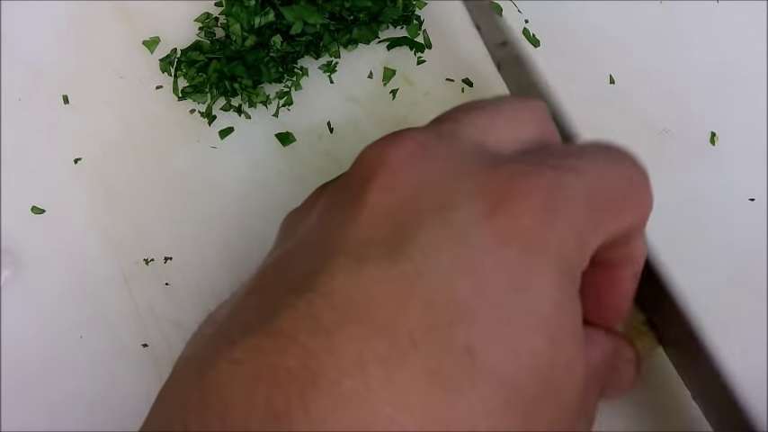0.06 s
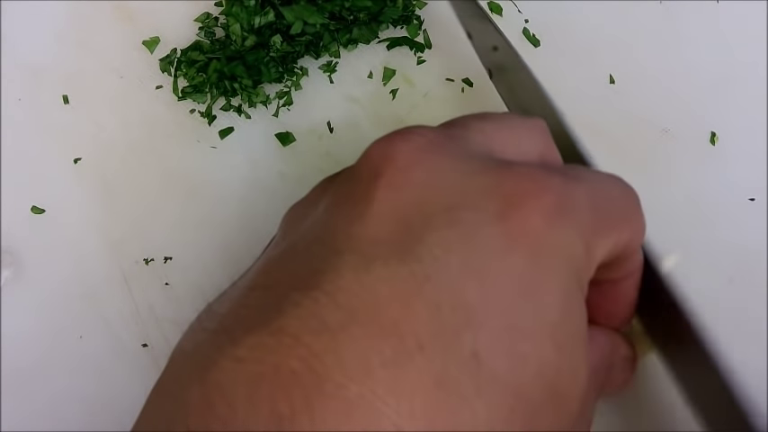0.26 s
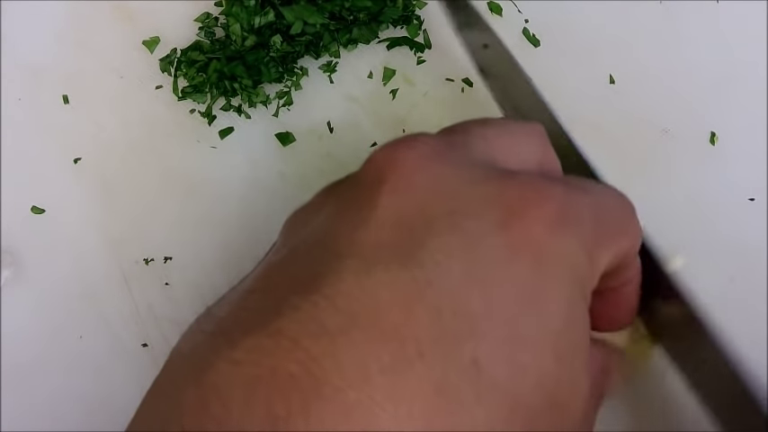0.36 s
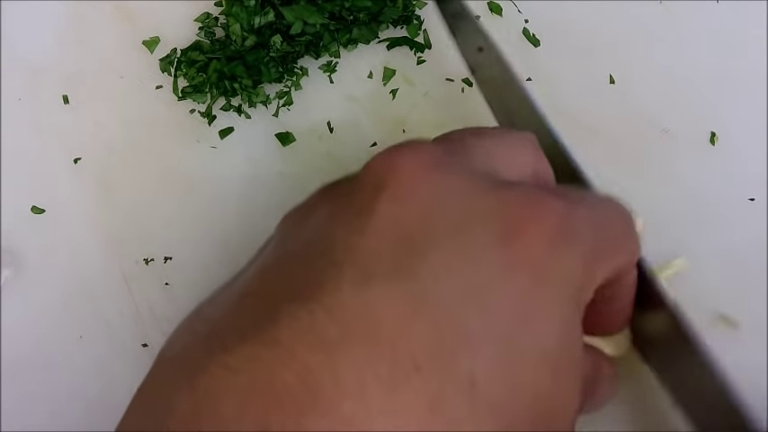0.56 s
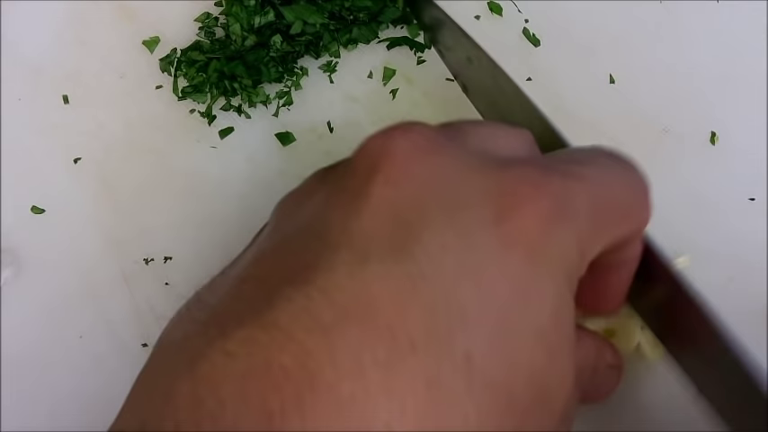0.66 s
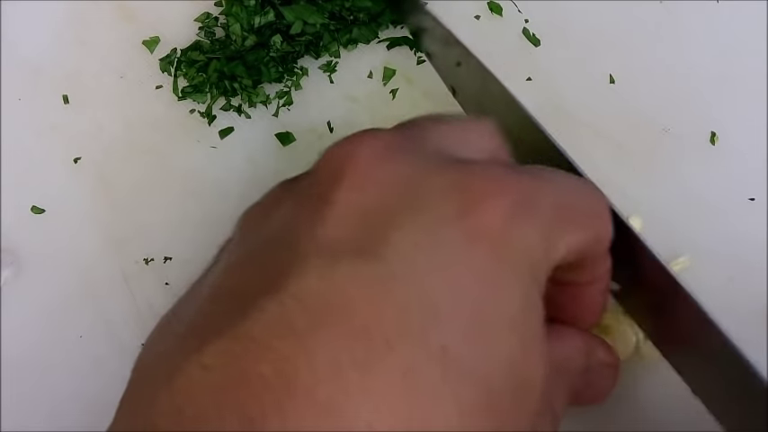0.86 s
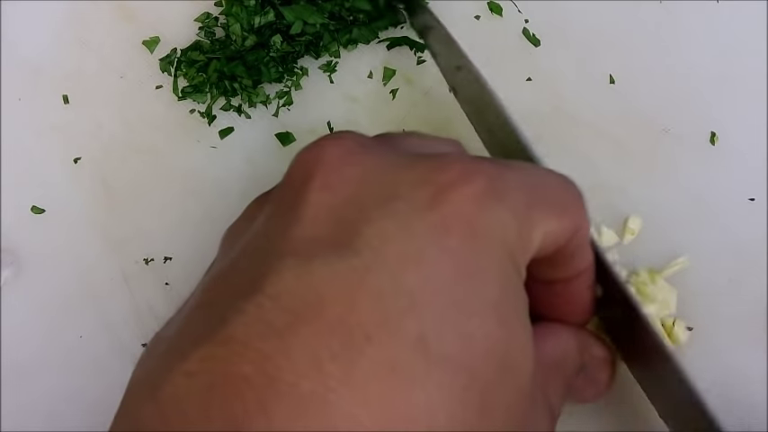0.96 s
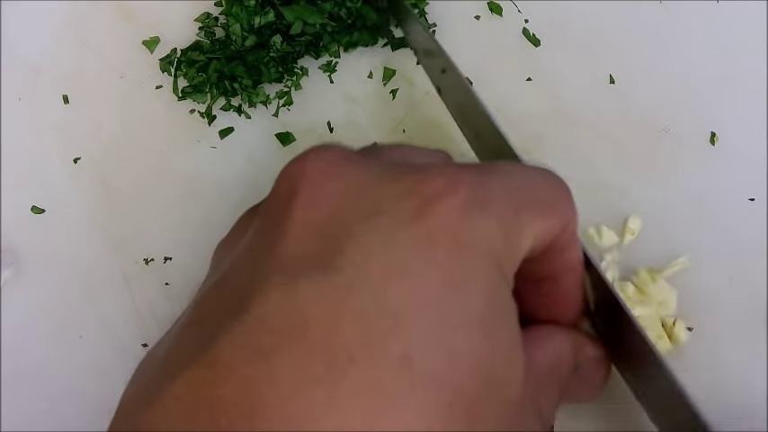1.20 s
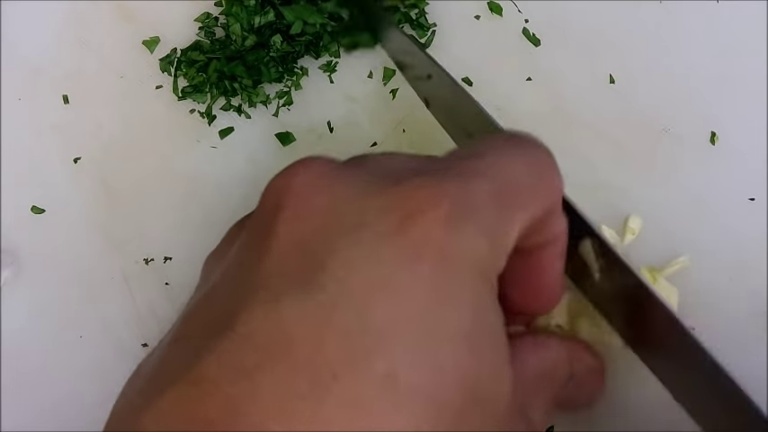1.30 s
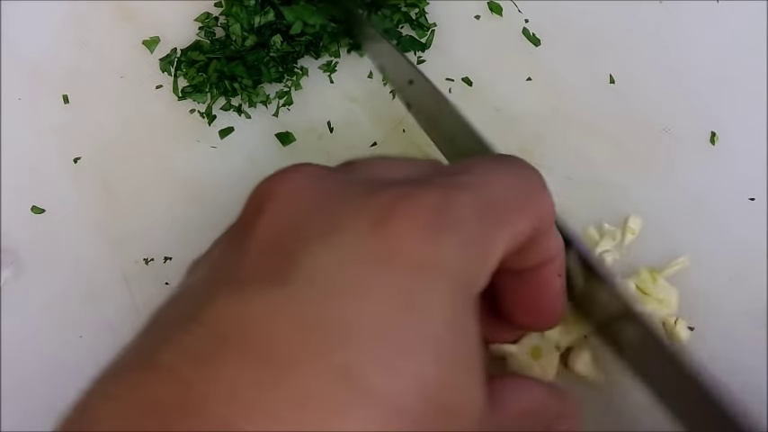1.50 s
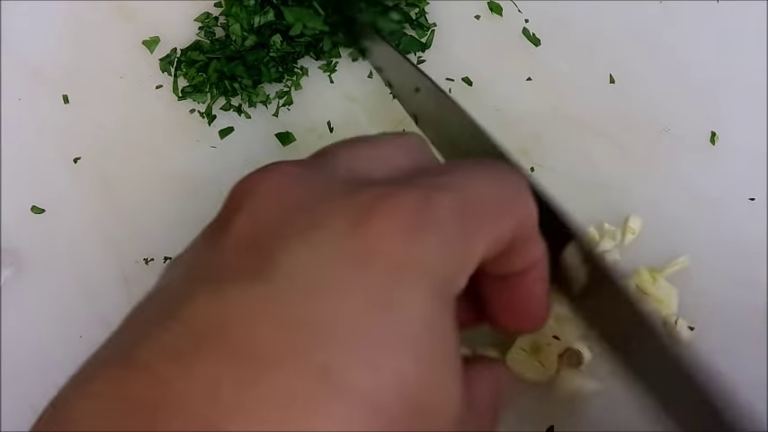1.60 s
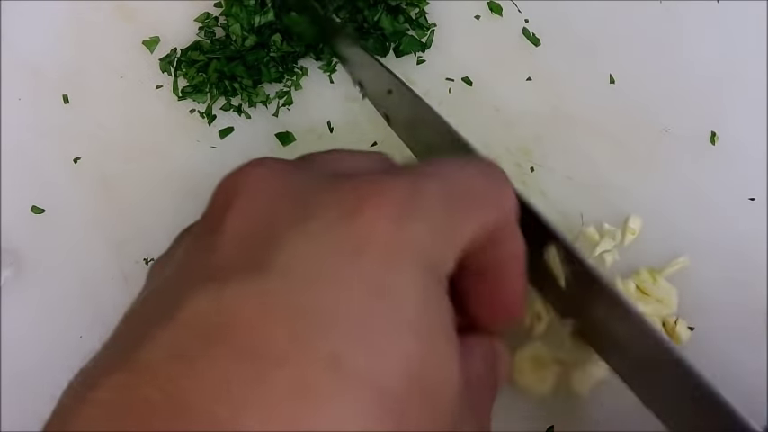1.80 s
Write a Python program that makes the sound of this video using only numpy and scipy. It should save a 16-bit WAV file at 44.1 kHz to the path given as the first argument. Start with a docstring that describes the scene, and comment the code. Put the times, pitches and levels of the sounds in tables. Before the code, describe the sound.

Close, steady knife chops through garlic, each crunch followed by a dull knock on plastic.

```python
"""A knock dies away, then crunch and knock alternate about four and a half times a second: a large
knife slices garlic on a plastic board, close by. In each stroke the clove's fibres fracture, then the
impact excites damped modes of the board and a low thump in the counter below. The steel blade rings
faintly, and a small kitchen reverberates over a quiet hum. The last stroke only crunches and does
not reach the board."""
import sys
import numpy as np
from scipy import signal
from scipy.fft import rfft, irfft, next_fast_len
from scipy.io import wavfile

SR = 44100
rng = np.random.default_rng(int(sys.argv[2]) if len(sys.argv) > 2 else 0)


def log_audio(samples):
    """Write samples as a 16-bit WAV file to the path given in sys.argv[1]."""
    # one column per channel
    frames = np.atleast_2d(samples).T
    # limit to full scale, then quantise
    limited = np.clip(frames, -1, 1)
    pcm = np.round(limited * 32767).astype(np.int16)
    wavfile.write(sys.argv[1], SR, pcm)


N = 81585
LEAD = SR // 10  # samples before time zero, so that an earlier chop still rings
SIZE = N + LEAD


def amp(db):
    """Decibels to amplitude ratio."""
    return 10 ** (np.asarray(db) / 20)

def unit(x):
    """Normalisation to rms 1."""
    return x / np.sqrt(np.mean(x ** 2) + 1e-20)

def along(points, hz):
    """Interpolation of (frequency, value) points on a logarithmic axis."""
    f, v = np.transpose(points)
    return np.interp(np.log(hz + 1), np.log(f + 1), v)

def filtered(x, response):
    """Linear filtering: the spectrum times a frequency response."""
    n = x.shape[-1]
    m = next_fast_len(n + 8192)
    return irfft(rfft(x, m) * response(np.fft.rfftfreq(m, 1 / SR)), m)[..., :n]

def rolled_off(x, hz, kind):
    """Causal third-order low-pass or high-pass."""
    return signal.sosfilt(signal.butter(3, hz, kind, fs=SR, output="sos"), x)

def coloured(x, spectrum):
    """Spectral shaping, at rms 1."""
    return unit(filtered(x, lambda hz: amp(along(spectrum, hz))))

def spread(pair, width):
    """Mid-side stereo from two uncorrelated signals."""
    mid, side = pair[0], width * pair[1]
    return np.array([mid + side, mid - side]) / np.sqrt(1 + width ** 2)

def noise(spectrum, width):
    """Coloured stereo noise of rms 1."""
    return coloured(spread(rng.standard_normal((2, SIZE)), width), spectrum)

def since(onset):
    """Seconds since the onset, zero before it."""
    return np.maximum((np.arange(SIZE) - LEAD) / SR - onset, 0)

def ring(t, hz, t60, rise):
    """A damped mode: a sinusoid that builds up and decays exponentially."""
    return np.sin(2 * np.pi * hz * t) * amp(-60 * t / t60) * (1 - np.exp(-t / rise))

def burst(onset, t60):
    """An envelope of sudden onset and exponential decay."""
    t = since(onset)
    return (t > 0) * amp(-60 * t / t60)


# ambient noise spectrum: (frequency [Hz], relative level [dB])
AMBIENT_SPECTRUM = [(25, -8), (60, 4.5), (110, -2), (300, 0), (500, -4), (1300, -5.5), (2500, -14.5),
                    (5000, -27.5), (15000, -38.5)]
# course of the hiss: (time [s], gain [dB])
HISS_FADE = [(1.25, 0), (1.449, -5), (1.7, -5)]
def background(air_db=-59, hiss_from_hz=2600, hum_hz=120.7, hum_db=-61):
    """Broadband room noise, whose hiss sinks toward the end, and the pure tone of an appliance's hum."""
    air = noise(AMBIENT_SPECTRUM, width=0.57)
    hiss = filtered(air, lambda hz: hz > hiss_from_hz)
    fade = amp(np.interp(since(0), *np.transpose(HISS_FADE)))
    hum = np.sin(2 * np.pi * hum_hz * since(0))
    return amp(air_db) * (air - hiss + fade * hiss) + amp(hum_db) * hum


# reverberation time: (frequency [Hz], T60 [s])
REVERB_TIMES = [(100, 0.26), (500, 0.33), (3000, 0.46), (8000, 0.54), (16000, 0.19)]
# colour of the reverberant field: (frequency [Hz], gain [dB])
REVERB_COLOUR = [(60, -5), (300, -0.5), (550, 7), (900, -4), (1300, -10.5), (1900, 1), (4000, -1),
                 (8000, -1.5), (16000, 2)]
def kitchen(x, tail_db=-8.5, early_db=-6.5, early_t60=0.1, delay_s=0.006):
    """Reverberation: convolution with dense early reflections and a short diffuse tail."""
    hz, t, spectra = signal.stft(rng.standard_normal((2, SR // 2)), SR, nperseg=256)
    absorption = amp(-60 * t / along(REVERB_TIMES, hz)[:, None])
    tail = signal.istft(spectra * absorption, SR, nperseg=256)[1]
    size = tail.shape[1]
    early = rng.standard_normal((2, size)) * amp(-60 * np.arange(size) / SR / early_t60)
    response = spread(amp(tail_db) * unit(tail) + amp(early_db) * unit(early), width=1) / np.sqrt(size)
    wet = signal.fftconvolve(x.mean(axis=0)[None], response, axes=1)[:, :SIZE]
    return filtered(wet, lambda f: amp(along(REVERB_COLOUR, f)) * np.exp(-2j * np.pi * f * delay_s))


# the knife's quick rebound just after each blow (first row), then echoes from nearby walls:
# (delay [s], level [dB], left share [0-1])
REBOUND_AND_ECHOES = [(.0105, -22.5, .5), (0.0165, -29.5, 0.6), (0.026, -21, 0.6), (.035, -28, 0.5),
                      (.063, -29, 0.3)]
def rebound_and_echoes(x):
    """Delay and attenuation: weaker copies stand for the knife's rebound, then for wall reflections."""
    def copies(hz):
        return sum(amp(db) * 2 * np.array([[left], [1 - left]]) * np.exp(-2j * np.pi * hz * delay)
                   for delay, db, left in REBOUND_AND_ECHOES)
    return filtered(x, copies)


# steel modes of the free blade: (frequency [Hz], level [dB], T60 [s])
BLADE_MODES = [(1410, -52, 0.48), (3410, -74, 0.36), (4265, -67, 0.25), (5110, -78.5, 0.52),
               (5185, -80, 0.65)]
# blows that leave the blade ringing: (time [s], level [dB])
BLADE_BLOWS = [(-.024, 1), (.2044, 0), (.4085, -9)]
# the blade dragging in the clove: (frequency [Hz], level [dB])
DRAG_MODES = [(2170, -45), (3020, -46.5)]
def blade(drag_at_s=1.798, drag_t60=0.045):
    """Free vibration: lightly damped steel rings on; held in the clove, it only grates briefly."""
    free = sum(amp(db + blow_db) * ring(since(onset), hz, t60, rise=0.0019)
               for onset, blow_db in BLADE_BLOWS for hz, db, t60 in BLADE_MODES)
    drag = sum(amp(db) * ring(since(drag_at_s), hz, drag_t60, rise=0.0012) for hz, db in DRAG_MODES)
    return free + drag


# modes of the counter: (frequency [Hz], level [dB], T60 [s], delay [s])
COUNTER_MODES = [(77.8, -30.5, 0.14, 0.0014), (100, -22.5, 0.076, 0.0052), (151.4, -20, 0.03, 0.01343),
                 (182.2, -45.5, 0.49, 0.0035), (245, -33, 0.091, 0.00034), (288.94, -35, 0.33, 0.0012),
                 (334, -43, 0.097, 0.00428)]
def counter(rise_cycles=0.64, lowest_hz=57, pan_db=1):
    """Structure-borne sound: the counter answers each impact with a low thump and a hollow ring."""
    thump = np.zeros(SIZE)
    for onset, _, thump_db, _, _ in IMPACTS:
        for hz, db, t60, delay in COUNTER_MODES:
            thump += amp(db + thump_db) * ring(since(onset + delay), hz, t60, rise_cycles / hz)
    return rolled_off(thump, lowest_hz, "high") * amp([[pan_db], [-pan_db]])


def fibres(spectrum, width, ruptures_per_s=2600, scatter_db=0.5):
    """Shot noise: dense, tiny ruptures of uneven size at random instants."""
    sizes = rng.standard_normal((2, SIZE)) * amp(scatter_db * rng.standard_normal(SIZE))
    breaks = rng.random(SIZE) < ruptures_per_s / SR
    return coloured(spread(sizes * breaks, width), spectrum)


# crunch through the air (crisp) and through the board (dull): (frequency [Hz], relative level [dB])
CRISP_SPECTRUM = [(300, -15), (2000, 12), (3800, 2.5), (5000, -0.5), (7000, 6.5), (9000, 6), (11000, -3.5),
                  (15500, -0.5)]
DULL_SPECTRUM = [(100, -50), (400, -9.5), (620, 1), (1150, 5.5), (1600, -7.5), (2300, -15), (4000, -19.5),
                 (9000, -32.5)]
# passes through the clove: (time [s], duration [s], crisp level [dB], dull level [dB])
SLICES = [(0.165, 0.028, -58, -42), (0.394, 0.03, -60, -48.5), (0.616, 0.036, -63, -51),
          (0.844, 0.028, -62.5, -46.5), (1.053, 0.05, -56, -50.5), (1.282, 0.025, -54.5, -50),
          (1.499, 0.037, -64.5, -50), (1.774, 0.024, -67, -52.5), (1.791, 0.028, -54, -50.5)]
# the clove gives way and jolts the board: (time [s], level [dB], frequency [Hz])
CLOVE_JOLTS = [(.174, -33.5, 690), (.4085, -26.5, 700), (0.638, -28, 937), (.856, -35.5, 1120),
               (1.061, -36, 657), (1.0845, -35.5, 1030), (1.299, -34, 620), (1.509, -36.5, 710),
               (1.5245, -32, 883), (1.799, -32.5, 837), (1.809, -36.5, 665)]
# single crisp snaps: (time [s], level [dB])
CLOVE_SNAPS = [(0.41, -49.5), (0.637, -47.5), (0.1745, -50.5), (1.509, -65), (1.1, -48), (1.02, -61),
               (1.288, -45.5), (1.52, -46), (1.8, -44.5)]
def garlic(rise_s=0.0082, release_s=0.011, upper_ratio=1.72, upper_db=-10.5):
    """Fracture: fibres crunch under the pressing blade, with a few jolts and snaps."""
    crisp, dull = fibres(CRISP_SPECTRUM, width=1.0), fibres(DULL_SPECTRUM, width=0.49)
    crunch = np.zeros((2, SIZE))
    for onset, duration, crisp_db, dull_db in SLICES:
        attack = 1 - np.exp(-np.square(since(onset) / rise_s))
        release = np.exp(-since(onset + duration) / release_s)
        crunch += attack * release * (amp(crisp_db) * crisp + amp(dull_db) * dull)
    for onset, db, hz in CLOVE_JOLTS:
        for ratio, mode_db in ((1, 0), (upper_ratio, upper_db)):  # each jolt excites two modes
            crunch += amp(db + mode_db) * ring(since(onset), hz * ratio, t60=0.02, rise=0.00034)
    snaps = sum(amp(db) * burst(onset, t60=0.021) for onset, db in CLOVE_SNAPS)
    return crunch + snaps * noise(CRISP_SPECTRUM, width=1.0)


# what a knock sends into the room: (frequency [Hz], gain [dB])
RADIATED_SPECTRUM = [(60, 1.5), (250, 14.5), (500, 2.5), (750, 11.5), (1200, 25), (1550, 16.5), (2000, 3),
                     (3300, -12), (8000, -27.5), (15000, -49)]
def board_radiation(crack_share=0.28, treble_from_hz=1230):
    """Radiation: the whole board sends a broadband knock into the room, duller for a softer crack."""
    def treble(hz):
        return crack_share * (1 - np.exp(-np.square(hz / treble_from_hz)))
    knocks = np.zeros(SIZE)
    for onset, knock_db, _, crack_db, _ in IMPACTS:
        impulse = amp(knock_db) * (np.arange(SIZE) == LEAD + round(onset * SR))
        knocks += filtered(impulse, lambda hz: amp(along(RADIATED_SPECTRUM, hz) + crack_db * treble(hz)))
    return knocks


# blade meets board, relative levels: (time [s], knock [dB], thump [dB], crack [dB], hollow mode [dB])
IMPACTS = [(-.024, -2, -3.5, -17, -33), (0.2045, 0, -1.5, 1.5, -12), (0.4334, -0.5, 0, 2, -42),
           (0.663, -1, -1.5, 0, -52), (0.8804, 0, 1, 2.5, -43), (1.111, -2.5, -1.5, -17.5, -33),
           (1.3226, -2, 1, -11, -32), (1.544, 0, 1.5, -4, -40)]
# modes of board and blade: (frequency [Hz], left level [dB], right level [dB], unchoked T60 [s])
BOARD_MODES = [(678, -22, -35, 0.021), (938.6, -18, -36, 0.071), (1082, -27.5, -22, 0.11),
               (1257.4, -15, -21.5, 0.058), (1357, -27, -14.5, 0.012), (1648, -50, -20, 0.019),
               (1946, -22.5, -32, 0.02), (2180, -21.5, -12.5, 0.0056), (2660, -30.5, -64, 0.16)]
# contact noise: (frequency [Hz], relative level [dB])
CRACK_SPECTRUM = [(200, -29), (700, -1), (1400, -2.5), (2500, 5), (3300, -6), (5000, -22), (9000, -33),
                  (16000, -61)]
def board(scatter_db=0.83, choke_s=0.0068, radiates_from_hz=795, contact_hz=1730, crack_base_db=-33):
    """Impact excitation: the edge strikes soft plastic, giving a dull crack and quickly damped modes."""
    modes, crack = np.zeros((2, SIZE)), np.zeros(SIZE)
    t = np.arange(SR // 20) / SR
    choke = np.exp(-(t / choke_s) ** 4)  # the blade presses on and stops the ring
    for onset, knock_db, _, crack_db, hollow_db in IMPACTS:
        knock = amp(hollow_db) * ring(t, hz=770, t60=0.026, rise=0.00025)
        for hz, left_db, right_db, t60 in BOARD_MODES:
            level = knock_db + scatter_db * rng.standard_normal()
            knock = knock + amp([[left_db + level], [right_db + level]]) * ring(t, hz, t60, rise=1 / SR)
        start = LEAD + round(onset * SR)
        modes[:, start:start + len(t)] -= knock * choke
        crack += amp(crack_base_db + crack_db) * burst(onset, t60=0.042)
    modes = rolled_off(modes, radiates_from_hz, "high")  # the board radiates little bass
    modes = rolled_off(modes, contact_hz, "low")  # a soft contact excites little treble
    return modes + crack * noise(CRACK_SPECTRUM, width=0.82)


def scene():
    """Superposition of direct sound, rebound, echoes, reverberation and background."""
    crunch, thump = garlic() + blade(), counter()
    knife = board() + crunch
    room = kitchen(crunch + board_radiation() + amp(-3.5) * thump)
    return (knife + rebound_and_echoes(knife) + thump + room + background())[:, LEAD:]

def record(dry, top_hz=15900):
    """Band limiting: an ideal low-pass removes the highest treble."""
    return filtered(dry, lambda hz: hz < top_hz)


dry = scene()
out = record(dry)
log_audio(out)
```